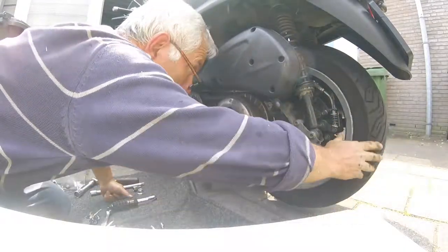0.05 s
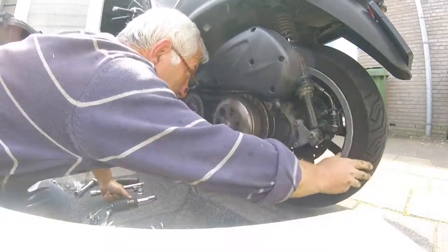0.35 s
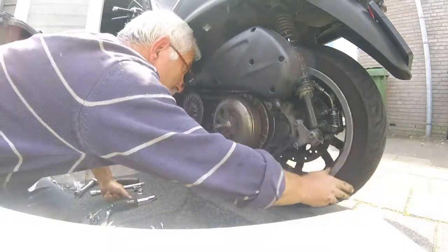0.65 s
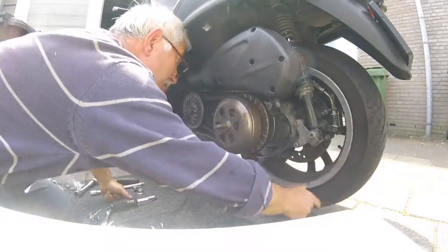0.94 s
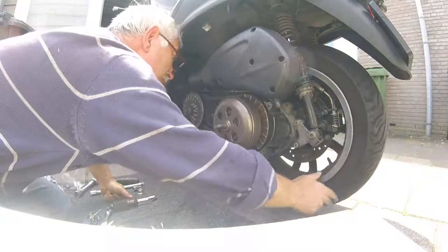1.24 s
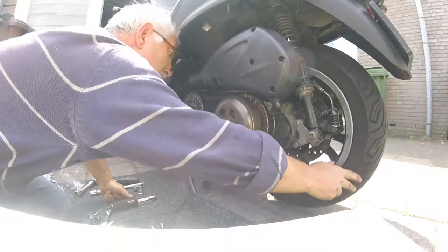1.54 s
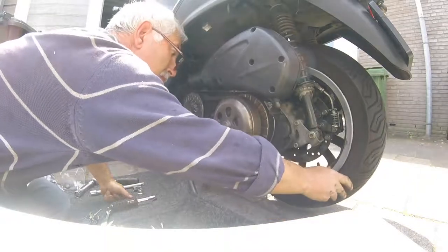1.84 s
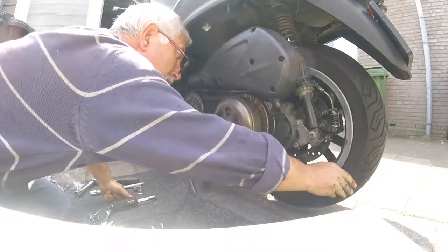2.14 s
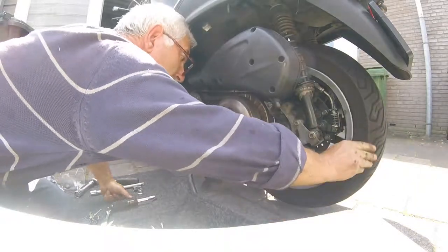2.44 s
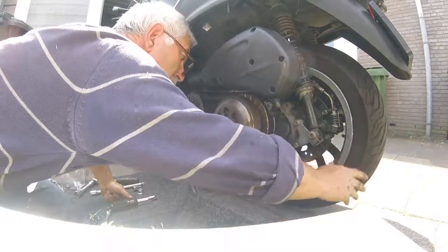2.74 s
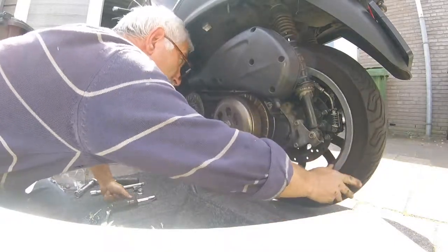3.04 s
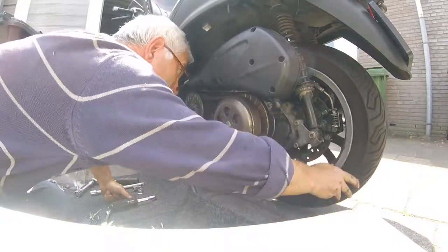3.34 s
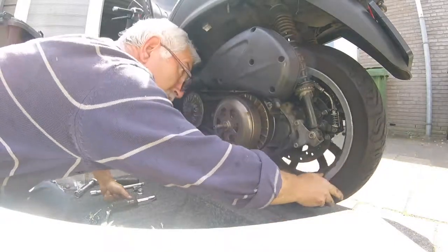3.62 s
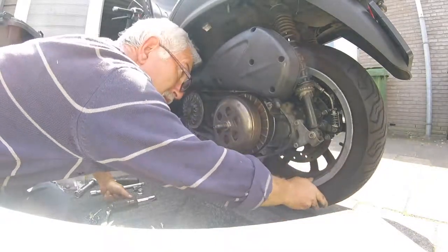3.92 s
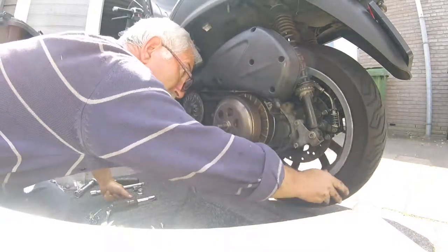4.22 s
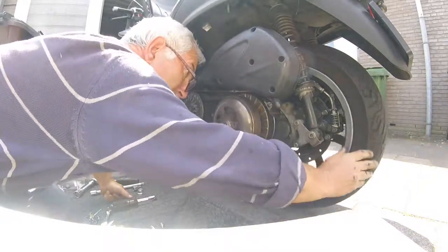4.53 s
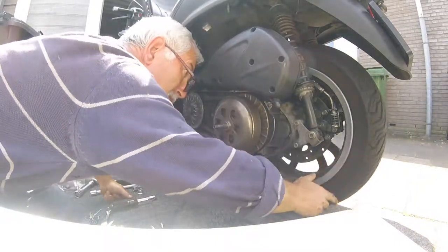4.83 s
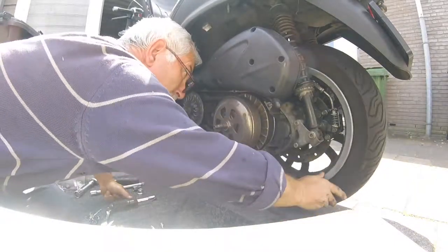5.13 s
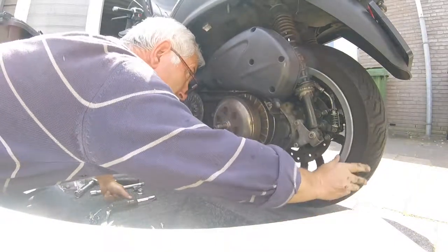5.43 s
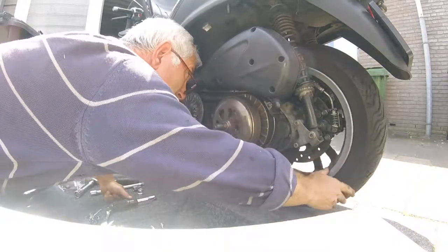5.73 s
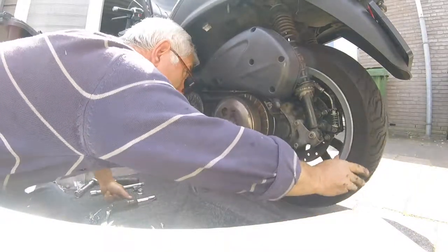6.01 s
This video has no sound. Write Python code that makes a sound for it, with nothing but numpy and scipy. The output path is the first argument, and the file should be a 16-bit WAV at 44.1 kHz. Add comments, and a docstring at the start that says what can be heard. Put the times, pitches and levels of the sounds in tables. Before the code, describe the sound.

A low outdoor rumble, faint hiss and the hum of a distant idling engine run throughout. Close by, a scooter's rear wheel is rocked by hand, and its parts rub very softly with each push. At about 0.8 seconds the slack in the drive runs out with a sharp, briefly ringing metal clack, followed by a lighter, thinner one at 1.2 seconds. The brake gives a barely audible whistle around 1.9 seconds. Small ticks between 2.2 and 2.5 seconds lead to the loudest clack at 2.8 seconds, which has a quick rebound. Tiny ticks follow at about 3.8 and 4.5 seconds. Far traffic swells gently as a low drone around 5 seconds. Lighter clacks come at 5.3 seconds, trailed by small ticks, and at 5.8 seconds. The hits stand well above the quiet background and die quickly, with a slight, short echo from the brick yard.

```python
"""A scooter's rear wheel is rocked to and fro by hand, with the transmission cover off.
From the start an engine hums far away over rumble and hiss, and each push makes the parts rub softly.
At 0.8 s the slack in the drive runs out: metal hits metal with a clack, and the brick yard echoes.
The brake whistles faintly around 1.9 s, then small ticks lead to the loudest clack at 2.8 s.
Far traffic swells around 5 s, and lighter clacks follow at 5.3 s and 5.8 s."""
import sys
import numpy as np
from scipy import signal
from scipy.fft import rfft, irfft, next_fast_len
from scipy.io import wavfile

SR = 44100
rng = np.random.default_rng(int(sys.argv[2]) if len(sys.argv) > 2 else 0)


def persist_wave(psi):
    """Save psi, clipped to +-1, as 16-bit WAV."""
    counts = np.round(np.clip(psi, -1, 1) * 32767).astype(np.int16)
    wavfile.write(sys.argv[1], SR, np.atleast_2d(counts).T)


N = 267598

# Distant traffic and air: pitch_hz, level_db
AIR_SPECTRUM = [(15, -4.5), (38, 2), (75, -0.5), (130, -7.5), (180, -13), (260, -18.5), (400, -24),
                (800, -28.5), (1500, -31.5), (3000, -37.5), (5000, -48), (14000, -60)]
# The breeze lifts the rumble: peak_s, rise_db, length_s
GUSTS = [(0.826, 3, 0.42), (4.6, 3, 0.65)]
# A steady, high hiss: pitch_hz, level_db
HISS_SPECTRUM = [(1000, -8.5), (4300, -26), (5000, -16.5), (5600, -14.5), (6150, -9), (6480, 2), (6900, -5),
                 (8000, -8), (9300, -11.5), (10300, -18), (11800, -14.5), (13500, -20.5)]
# The far engine's tones: multiple_of_idle_pitch, level_db, fade_db_per_s
ENGINE_TONES = [(1, -53.5, 0.5), (2, -59, 2.6), (3, -69, 0.3), (4, -87.5, -2.5)]
# Soft scuffs of the hand on the tyre: start_s, pitch_hz, level_db, length_s
SCUFFS = [(0.681, 520, -67, 0.04), (2.624, 520, -74, 0.14), (3.737, 496, -68.5, 0.15),
          (4.25, 365, -62.5, 0.059), (5.963, 228, -56.5, 0.04)]
# Turning parts rubbing together: pitch_hz, level_db
RUB_SPECTRUM = [(100, -9.5), (300, 5), (600, 2.5), (780, -4.5), (1050, -0.5), (1400, -4), (1700, -7),
                (2000, -9.5), (3000, -15.5), (5000, -21.5), (12000, -44.5)]
# Pushes that turn the wheel: fastest_s, rub_level_db, length_s, boosted_pitch_hz
PUSHES = [(.05, -66.5, 1.15, 400), (1.105, -63.5, 1.17, 1000), (2.698, -63.5, .6, 620),
          (3.207, -64, 0.63, 1230), (4.567, -60.5, 0.49, 970), (5.195, -61, 0.85, 1330),
          (6.004, -68, 0.56, 1050)]
# How long the yard echoes (a decay is the time to fall by 60 dB): pitch_hz, decay_s
YARD_DECAYS = [(150, 0.32), (500, 0.31), (880, 0.13), (1400, 0.2), (3000, 0.17), (5500, 0.21),
               (12000, 0.038)]
# The tones that the gear case, clutch and rim ring with: pitch_hz, level_db, decay_s
METAL_TONES = [(196, -31, .11), (335, -39, .07), (410, -38, .06), (506, -24, .06), (562, -33, .07),
               (624, -30.5, .07), (672, -32, .065), (733, -27.5, .06), (826, -22.5, .055),
               (874, -17.5, .052), (958, -28.5, .055), (1023, -30.5, .06), (1235, -22.5, .055),
               (1295, -27, .055), (1372, -18.5, .052), (1434, -19.5, .05), (1504, -27, .053),
               (1595, -25, .053), (1709, -26.5, .048), (1770, -29.5, .049), (1995, -28.5, .05),
               (2106, -30, .044), (2198, -29.5, .05), (2870, -26, .022), (2960, -23, .023),
               (3543, -27, .022), (3634, -25, .022), (4765, -36, .033), (5080, -33, .029),
               (5450, -37, .026)]
# The crowd of short overtones in a crack: pitch_hz, level_db
CRACK_SPECTRUM = [(150, -21), (430, -6), (1080, -11.5), (1500, 4.5), (2300, 3), (2680, -0.5), (2930, 4.5),
                  (3250, -3.5), (3600, -1), (4250, -3.5), (5300, 1), (5900, -7.5), (6600, -8), (9000, -20),
                  (10500, -27.5)]
# Metal hitting metal in the drive: start_s, ring_db, crack_db, crack_tilt_db_per_octave, boosted_hz
HITS = [(0.8353, -7, -2, -2.5, 2950), (1.1997, -25.5, -10.5, 4, 3300), (2.2519, -53, -36, 2, 5500),
        (2.3018, -53, -29, 5.5, 4200), (2.3665, -49, -29.5, 2, 2000), (2.4640, -49, -25, -2, 4130),
        (2.7647, 1.5, -5.5, 0.5, 3600), (2.8238, -27, -13.5, -1, 5200), (3.8185, -48, -37, 2, 4250),
        (4.4755, -38, -38, -8, 1099), (4.5895, -43, -33, 2, 5230), (5.2620, -20, -11, -0.5, 1730),
        (5.3045, -50, -33, 4, 3600), (5.3603, -39, -24, -0.5, 3650), (5.8236, -14, -18, 0, 2960)]


def amp(db):
    """Turns decibels into a number to multiply a sound by."""
    return 10 ** (np.asarray(db) / 20)


def unit(x):
    """Scales a signal to an average (rms) size of 1."""
    return x / np.sqrt(np.mean(x ** 2) + 1e-20)


def look_up(table, hz):
    """Reads a table at any pitch, blending between its rows."""
    pitches, values = np.transpose(table)
    return np.interp(np.log(hz + 1), np.log(pitches + 1), values)


def add(mix, start_s, sound):
    """Mixes a sound in at a given time."""
    part = mix[round(start_s * SR):][:len(sound)]
    part += sound[:len(part)]


def hump(hz, centre_hz, octaves):
    """A bell curve of height 1 around one pitch."""
    return np.exp(-(np.log2((hz + 1) / centre_hz) / octaves) ** 2)


def swell(peak_s, length_s, rise_share=0.38):
    """A smooth rise to 1 and a fall; rise_share is the part spent rising."""
    t = np.arange(N) / SR - peak_s
    width_s = length_s * np.where(t < 0, rise_share, 1 - rise_share)
    return np.exp(-(t / width_s) ** 2)


def shape(x, gain_at):
    """Turns each pitch in a signal up or down by gain_at(hz)."""
    return irfft(rfft(x) * gain_at(np.fft.rfftfreq(len(x), 1 / SR)), len(x))


def noise(spectrum, size=N):
    """Noise whose balance of low and high follows a table."""
    return unit(shape(rng.standard_normal(size), lambda hz: amp(look_up(spectrum, hz))))


def drift(rate_hz):
    """A random wander, mostly slower than the given rate."""
    white = rng.standard_normal(next_fast_len(N, True))
    return unit(shape(white, lambda hz: 1 / (1 + (hz / rate_hz) ** 4))[:N])


def noise_band(pitch_hz, octaves, size=N):
    """Noise gathered around one pitch."""
    white = rng.standard_normal(next_fast_len(size, True))
    return unit(shape(white, lambda hz: hump(hz, pitch_hz, octaves))[:size])


def background(rumble_db=-53, air_db=-52, hiss_db=-68.5):
    """Outdoor rumble that swells with the breeze, under steady air noise and hiss."""
    gust_db = sum(rise_db * swell(peak_s, length_s) for peak_s, rise_db, length_s in GUSTS)
    air = noise(AIR_SPECTRUM)
    rumble = signal.sosfiltfilt(signal.butter(2, 250, fs=SR, output="sos"), air)
    hiss = noise(HISS_SPECTRUM)
    return rumble * amp(rumble_db + gust_db) + (air - rumble) * amp(air_db) + hiss * amp(hiss_db)


def far_traffic(level_db=-59):
    """Traffic passes far away as a low drone that comes and goes."""
    return amp(level_db) * swell(peak_s=5.05, length_s=1.7) * noise_band(pitch_hz=135, octaves=0.2)


def far_engine(idle_hz=96.7, slowing_hz_per_s=0.21, wobble=0.0022, waver_db=0.2):
    """An idling engine slows a little and drifts away; its low tones waver on their way through the air."""
    out, t = np.zeros(N), np.arange(N) / SR
    pitch_hz = (idle_hz - slowing_hz_per_s * t) * (1 + wobble * drift(6.5))
    cycles = np.cumsum(pitch_hz) / SR
    arch_db = -0.49 * (t - 2.7) ** 2  # a rise and fall shared by all the tones
    for multiple, level_db, fade_db_per_s in ENGINE_TONES:
        gain = amp(level_db + arch_db - fade_db_per_s * t + waver_db * drift(4.5))
        out += gain * unit(np.sin(2 * np.pi * (multiple * cycles + rng.random())))
    return out


def brake_whistle(level_db=-85):
    """The brake drags and gives a thin whistle."""
    return amp(level_db) * swell(peak_s=1.9, length_s=0.55) * noise_band(pitch_hz=4850, octaves=0.04)


def hand_scuffs():
    """The hand scuffs the rubber tyre, making soft puffs of noise."""
    out = np.zeros(N)
    for start_s, pitch_hz, level_db, length_s in SCUFFS:
        size = int(length_s * SR)
        puff = noise_band(pitch_hz, octaves=0.53, size=size) * signal.windows.tukey(size, 0.7)
        add(out, start_s, amp(level_db) * unit(puff))
    return out


def wheel_rub(between_pushes_db=-78.5, flicker_db=1.7, boost=1.1):
    """The turning parts rub unevenly, louder with each push."""
    rub = noise(RUB_SPECTRUM)
    out = amp(between_pushes_db) * noise(RUB_SPECTRUM)
    for fastest_s, level_db, length_s, boosted_hz in PUSHES:
        band = signal.lfilter(*signal.iirpeak(boosted_hz, Q=2.2, fs=SR), rub)
        scrape = np.roll(unit(rub + boost * band), rng.integers(N))  # shifted so no two pushes match
        out += amp(level_db) * swell(fastest_s, length_s, rise_share=0.47) * scrape
    return out * amp(flicker_db * drift(29.73))


def yard_echo(sound, delay_s=0.0057, echo_db=-17):
    """Adds scattered echoes off paving, bodywork and brick; each pitch dies at its own speed."""
    hz, t, bands = signal.stft(rng.standard_normal(SR // 2), SR, nperseg=256)
    decay = amp(-60 * t / look_up(YARD_DECAYS, hz)[:, None])
    tail = signal.istft(bands * decay, SR, nperseg=256)[1]
    tail *= np.clip(np.arange(len(tail)) / SR / delay_s - 1, 0, 1)  # silent until the first echo is back
    return sound + amp(echo_db) * signal.fftconvolve(sound, tail / np.linalg.norm(tail))[:N]


def metal_ring(t, gain_db_at, lag_cycles=1.5, swell_cycles=1.1):
    """Struck metal rings with many tones; each takes a few cycles to swell, then dies away."""
    out = np.zeros(len(t))
    for hz, level_db, decay_s in METAL_TONES:
        lag_s = lag_cycles / hz if hz < 2400 else 0  # the slow, low tones arrive a moment later
        age = np.maximum(t - lag_s, 0)
        envelope = (1 - np.exp(-age * hz / swell_cycles)) * amp(-60 * age / decay_s)
        gain = amp(level_db + gain_db_at(hz) + 0.5 * rng.standard_normal())
        out += gain * envelope * np.sin(2 * np.pi * hz * age + 0.82 * rng.standard_normal())
    return out


def metal_crack(t, strength_db, gain_db_at):
    """The hard edge of a hit: a crowd of overtones, gone sooner the lighter the hit."""
    overtones = shape(noise(CRACK_SPECTRUM, len(t)), lambda hz: amp(gain_db_at(np.maximum(hz, 500))))
    time_scale = np.exp(0.01 * strength_db)
    rise_s, decay_s = 0.0022 * time_scale, 0.062 * time_scale
    return overtones * np.minimum(t / rise_s, 1) * amp(strength_db - 28.5 - 60 * t / decay_s)


def drive_clacks(settle_s=0.023, damping_db=-7):
    """Slack in the drive runs out and metal hits metal; every clack and tick rings the same parts."""
    out, t = np.zeros(N), np.arange(SR // 4) / SR
    # The parts settle together and damp each other.
    damping = amp(damping_db / 2 * (1 + np.tanh((t - settle_s) / 0.0028)))
    for start_s, ring_db, crack_db, crack_tilt, boosted_hz in HITS:
        ring_tilt = 0.34 + 0.1369 * ring_db  # dB per octave: harder hits ring brighter
        boost_db = -0.2071 * crack_db  # the spot that is struck boosts one pitch, more so in light hits
        contact_db = lambda hz: boost_db * hump(hz, boosted_hz, octaves=0.14)
        ring = metal_ring(t, lambda hz: ring_db + ring_tilt * np.log2(hz / 1400) + contact_db(hz))
        crack = metal_crack(t, crack_db, lambda hz: crack_tilt * np.log2(hz / 3000) + contact_db(hz))
        add(out, start_s, damping * ring + crack)
    return out


def scene():
    """The scooter in its yard and the distant sounds, mixed to one channel."""
    scooter = yard_echo(drive_clacks()) + wheel_rub() + hand_scuffs() + brake_whistle()
    return (scooter + far_engine() + far_traffic() + background())[None]


def record(dry):
    """Cuts away the highest treble, above 13900 Hz."""
    low_pass = signal.firwin(301, 13900, window=("kaiser", 8), fs=SR)
    return signal.oaconvolve(dry, low_pass[None], "same")


dry = scene()
out = record(dry)
persist_wave(out)
```